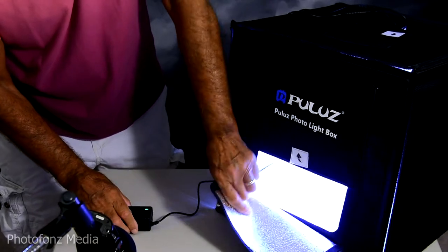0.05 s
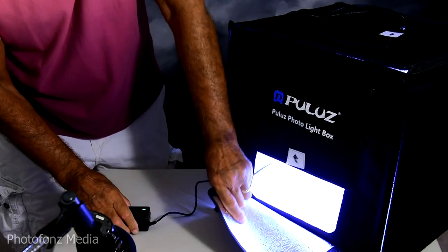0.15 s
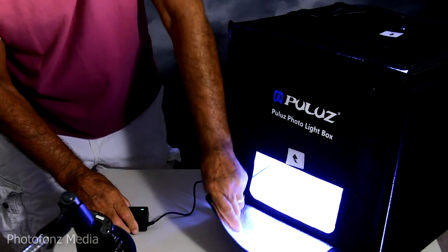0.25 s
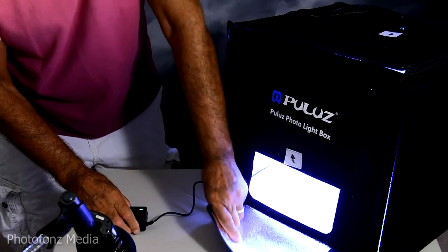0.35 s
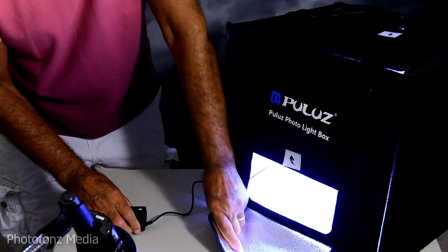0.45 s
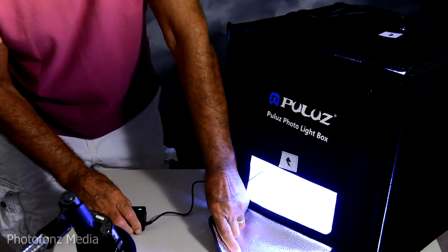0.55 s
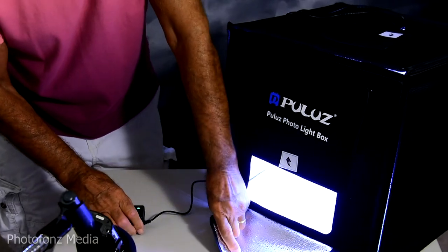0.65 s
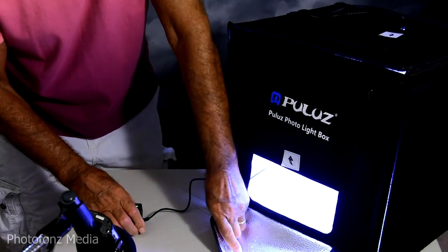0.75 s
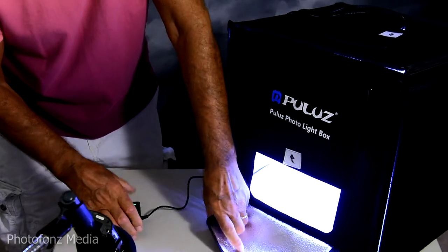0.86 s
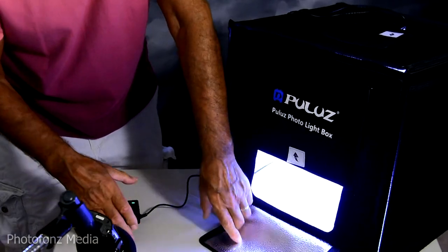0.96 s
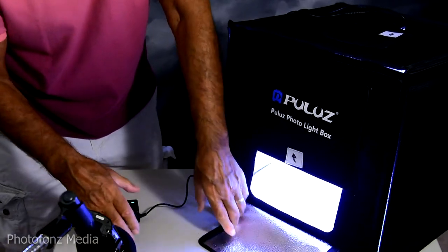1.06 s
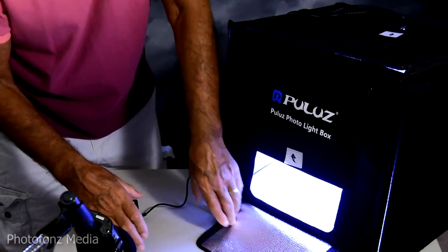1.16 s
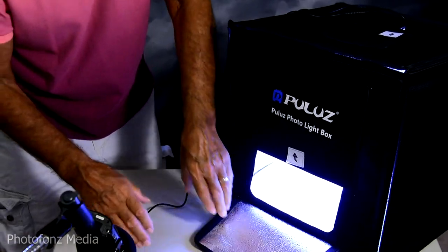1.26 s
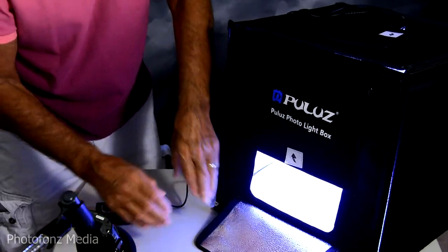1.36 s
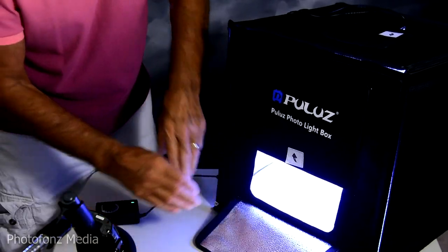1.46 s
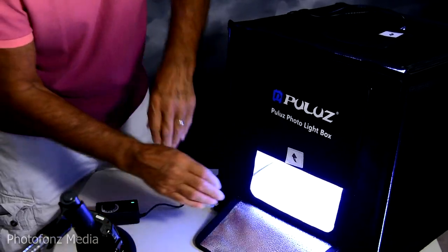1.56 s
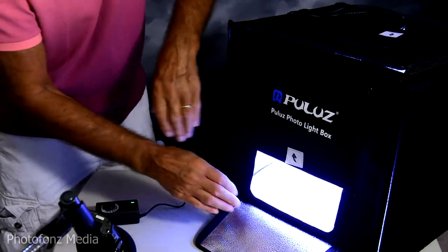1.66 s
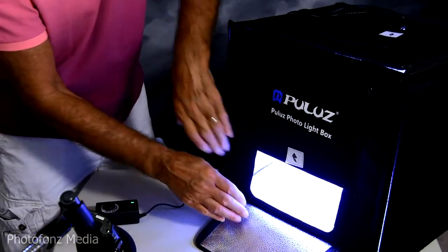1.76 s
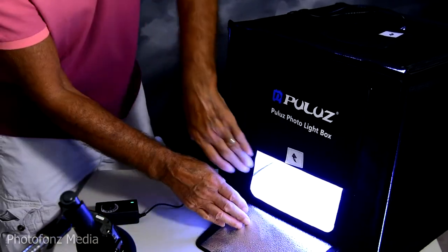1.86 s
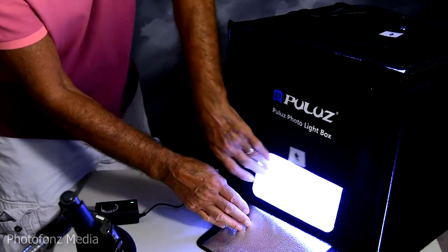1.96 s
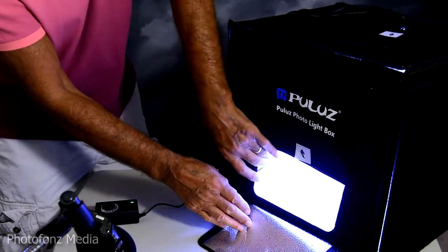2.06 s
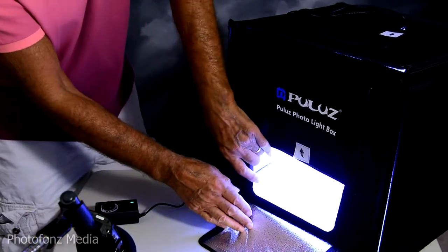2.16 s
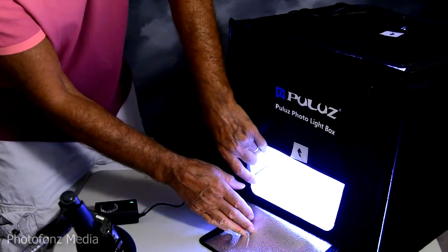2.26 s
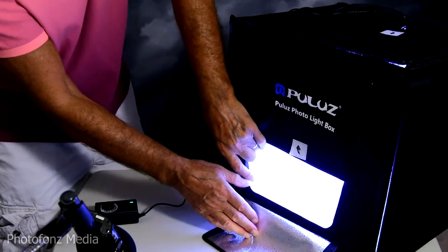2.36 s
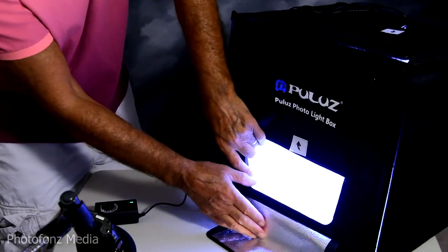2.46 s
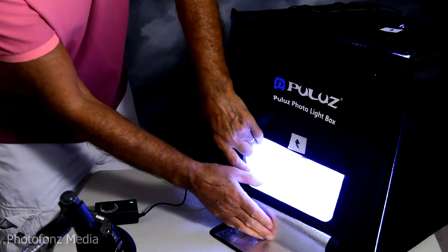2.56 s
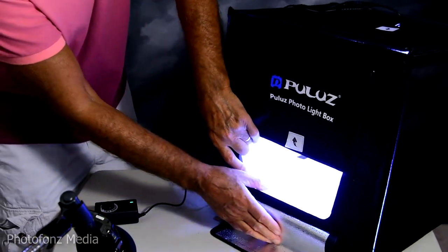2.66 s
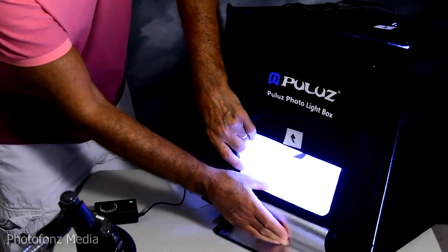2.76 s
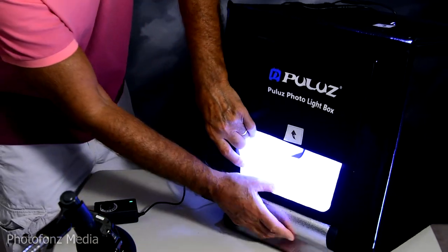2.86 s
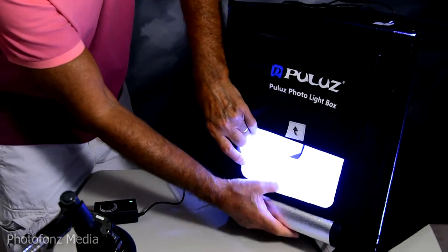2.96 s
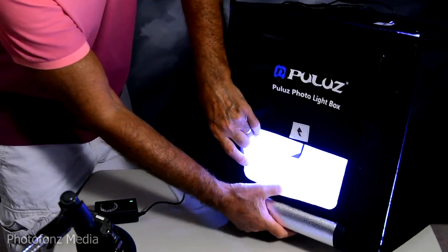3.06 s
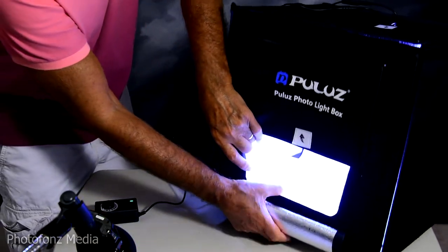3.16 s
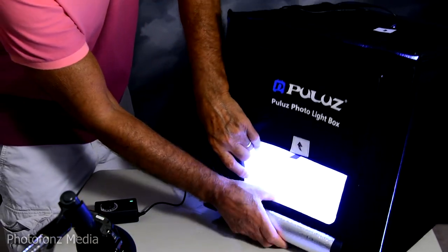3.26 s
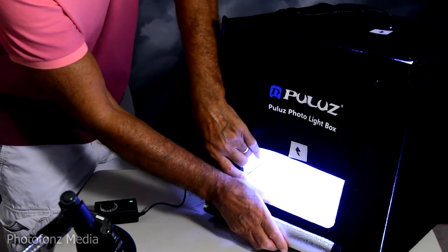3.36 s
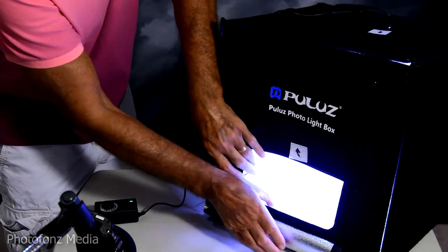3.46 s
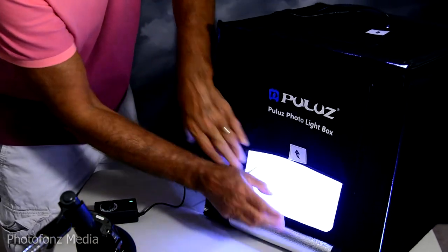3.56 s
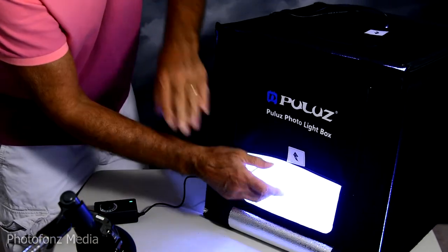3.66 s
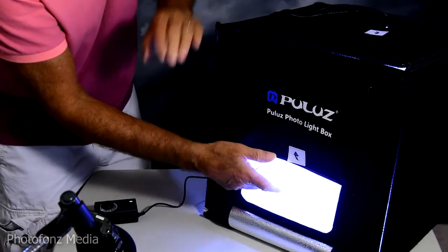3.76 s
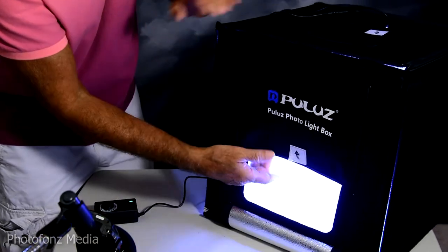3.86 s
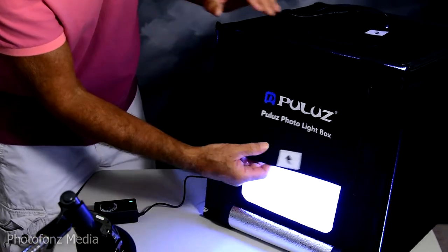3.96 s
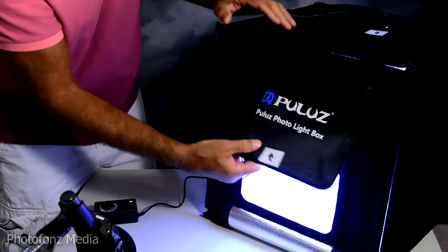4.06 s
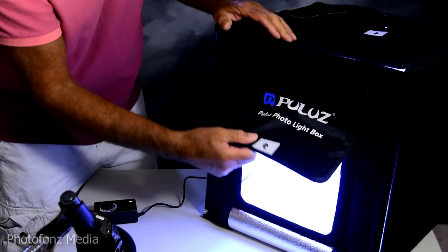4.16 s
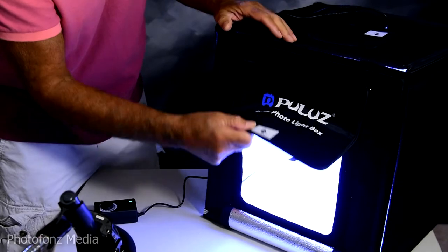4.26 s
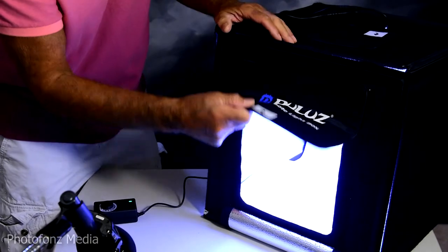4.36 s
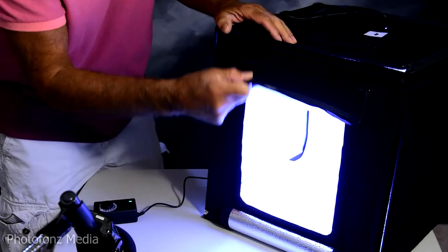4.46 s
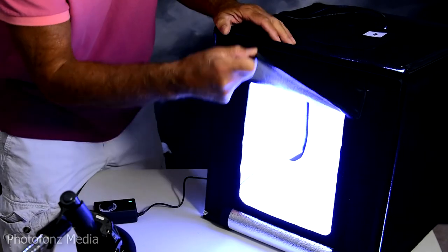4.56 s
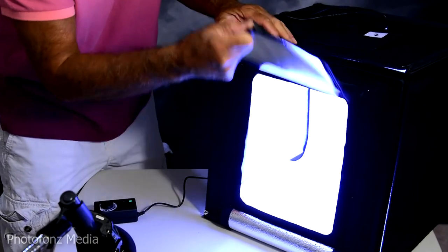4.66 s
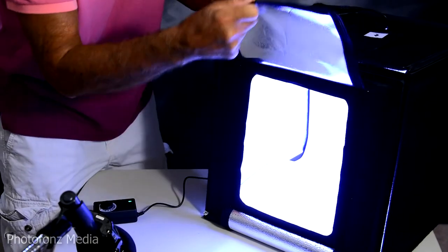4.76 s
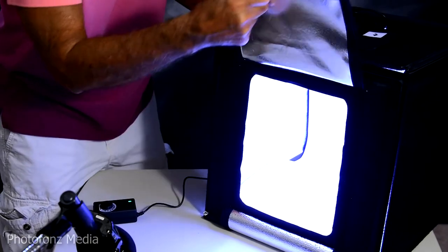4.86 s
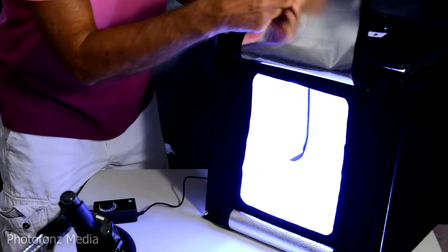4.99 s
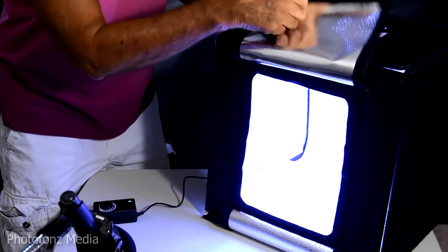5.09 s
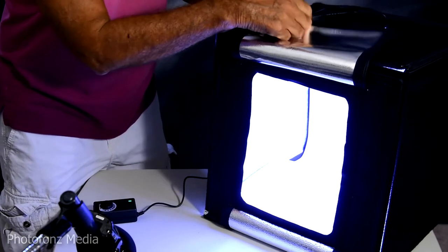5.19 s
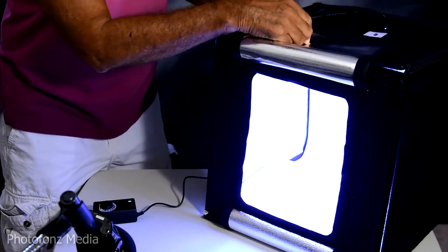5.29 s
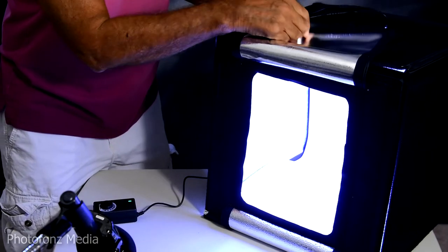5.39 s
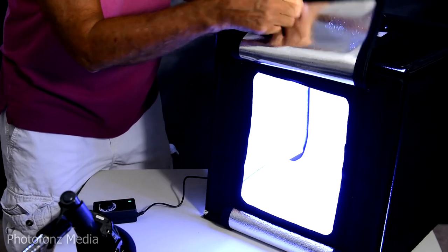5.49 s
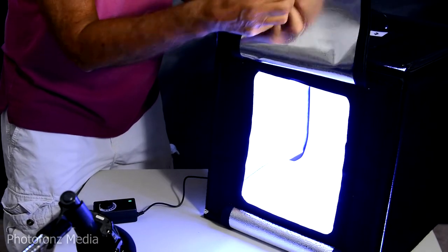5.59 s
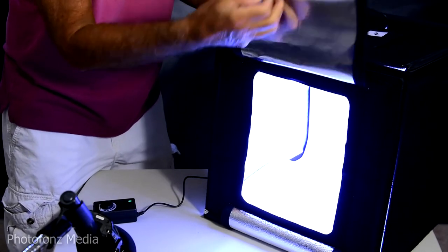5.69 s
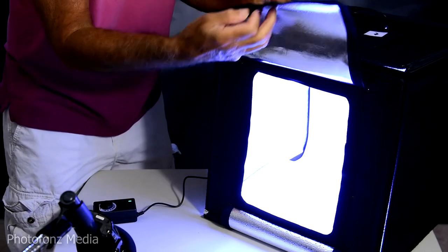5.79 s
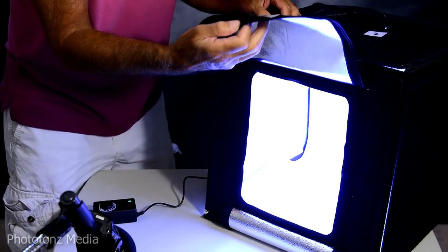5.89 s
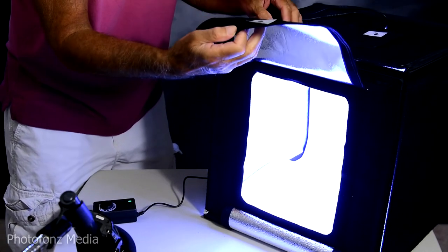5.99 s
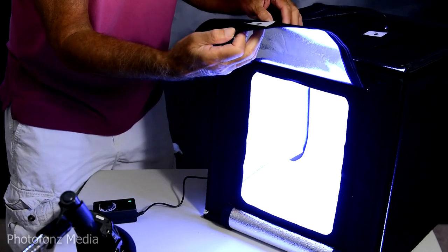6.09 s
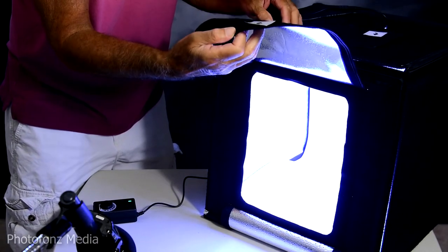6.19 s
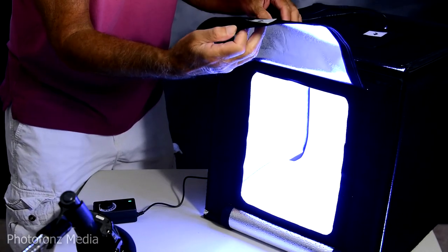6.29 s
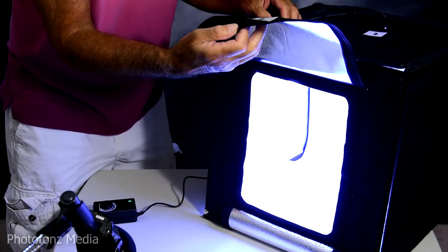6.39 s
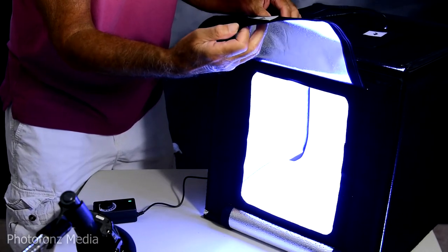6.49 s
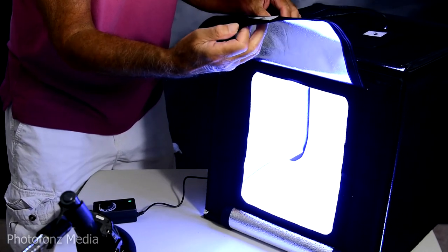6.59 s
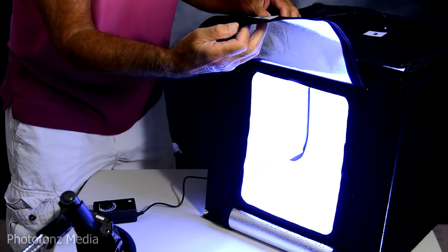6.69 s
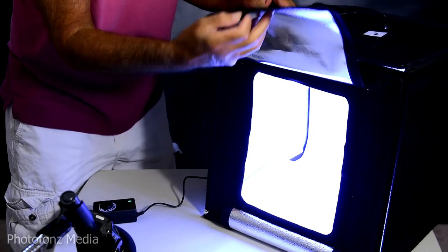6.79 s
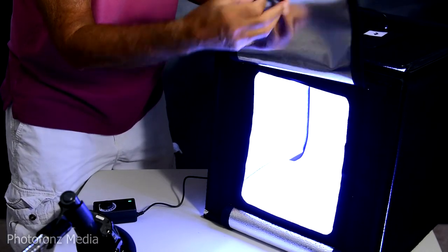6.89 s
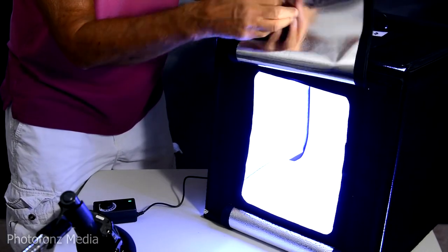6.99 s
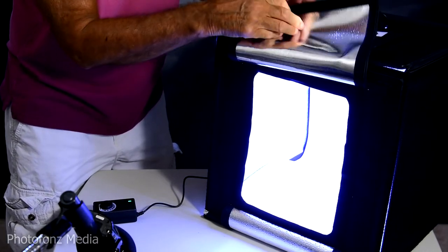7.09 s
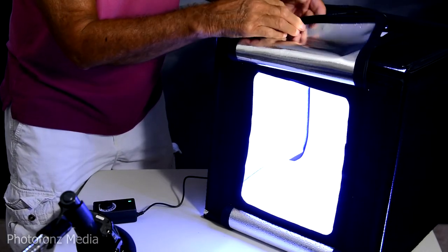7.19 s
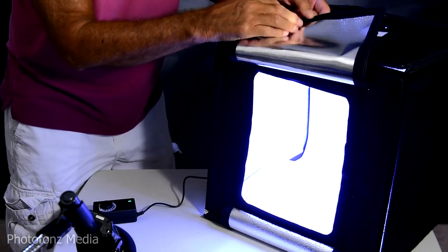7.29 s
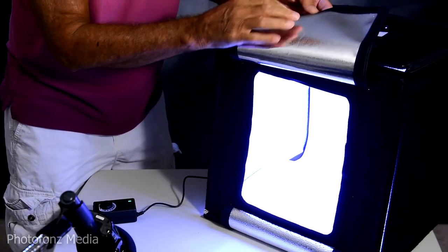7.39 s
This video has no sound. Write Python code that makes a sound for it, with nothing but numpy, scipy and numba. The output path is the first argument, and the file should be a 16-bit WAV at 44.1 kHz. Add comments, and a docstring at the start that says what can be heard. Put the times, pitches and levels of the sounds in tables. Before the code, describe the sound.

A short jerky hook-and-loop rip, soft cloth rubbing and foil crinkles, then a long crackling tear of fastener and quiet fabric scrapes in a small room.

```python
"""Hands open the hook-and-loop flaps of a foil-lined fabric box, close to two microphones in a small quiet room.
First a short rip: hooks let go in jerks that drum the taut panel, snap in the weave and crackle.
Then the cloth rubs and scrapes, the foil crinkles and pops, and near 3.1 s skin squeaks once on the foil.
From about 4.1 to 4.8 s a long strip tears open in dense, lumpy jerks and bright hook ticks.
Lighter scrapes follow, then near quiet, and a last patch of rubbing and crinkling ends the scene."""
import sys
import numpy as np
from scipy import signal
from scipy.fft import rfft, irfft, next_fast_len
from scipy.io import wavfile
from scipy.ndimage import uniform_filter1d
from numba import njit

SR = 44100
rng = np.random.default_rng(int(sys.argv[2]) if len(sys.argv) > 2 else 0)


def store_pcm(level_fs):
    """Save levels as 16-bit WAV."""
    pcm = np.round(np.clip(level_fs, -1, 1) * 32767).astype(np.int16)
    wavfile.write(sys.argv[1], SR, np.atleast_2d(pcm).T)


N = 328047

# Fastener jerks, a few hooks at once; scene() trims each of the three sounds.
# (t/s, snap level/dB, drum over snap/dB, crackle over snap/dB, fade/s)
JERK_EVENTS = [(0.0012, -11.5, 6.5, -7.5, 0.00048), (0.0237, -6, 4.5, -7.5, 0.00091),
               (0.0578, -19.5, -11, -4, 0.0012), (0.0721, -10.5, 2.5, -9.5, 0.00095),
               (0.0906, -9, 0, -9.5, 0.00071), (0.0989, -11, 0.5, -4, 0.0012),
               (0.205, -15, 6, -5.5, 0.0016), (0.2247, -8, 0.5, -10.5, 0.00059),
               (0.2411, -26, 0, -9, 0.0018), (0.2529, -13.5, -8.5, -11.5, 0.0015),
               (0.3, -7.5, -11.5, -21, 0.0011), (0.3063, -11.5, -1, -17, 0.0021),
               (0.3181, -3.5, -3, -12, 0.00061), (4.1185, -22.5, 11.5, -2.5, 0.0011),
               (4.1245, -32, -6, -3, 0.0011), (4.1463, -17, 5.5, -5.5, 0.0012),
               (4.1638, -15.5, 2.5, -2.5, 0.0071), (4.1769, -24.5, 4.5, -2.5, 0.0028),
               (4.2103, -21, 9.5, 6.5, 0.0055), (4.2145, -18.5, 6, 2.5, 0.0025),
               (4.2435, -22.5, -7, 8.5, 0.0024), (4.2609, -12, 6, 1, 0.0041),
               (4.281, -20.5, 5, -0.5, 0.0064), (4.3195, -17.5, 0.5, 0, 0.0054),
               (4.324, -17, 4.5, 0, 0.0024), (4.3377, -19, 3, 3.5, 0.0051),
               (4.3599, -15.5, 4, -1.5, 0.0088), (4.3765, -18.5, 3.5, 6, 0.0038),
               (4.386, -19.5, 3.5, -2.5, 0.0054), (4.3925, -18.5, 1, -4.5, 0.002),
               (4.399, -15.5, 3.5, -4.5, 0.003), (4.4145, -16.5, 6, -6.5, 0.0024),
               (4.4185, -17, 5.5, -4, 0.0018), (4.4329, -22.5, 2.5, 6, 0.002),
               (4.439, -19.5, 3, 2.5, 0.0043), (4.463, -21.5, 6, -0.5, 0.0018),
               (4.4702, -14.5, 5.5, -3, 0.0016), (4.482, -18, 3.5, 1.5, 0.0023),
               (4.4913, -22.5, 8.5, 6.5, 0.0015), (4.5035, -20, 6, 4.5, 0.0053),
               (4.5227, -22, 12, 9, 0.00058), (4.5383, -9.5, 9.5, 11, 0.0005),
               (4.5486, -15.5, 8, 5.5, 0.0015), (4.5805, -14.5, 3.5, 10, 0.0022),
               (4.586, -15, 5.5, -0.5, 0.0016), (4.5987, -9.5, 0, 9, 0.0015),
               (4.6032, -6.5, -0.5, -2.5, 0.0021), (4.6141, -19.5, 1, 4, 0.0024),
               (4.6354, -6, 2, 5, 0.0023), (4.6483, -18, -1, -2.5, 0.007), (4.6581, -18, -13.5, 4, 0.00081),
               (4.6681, -11.5, -2.5, 9, 0.0014), (4.6777, -16.5, 8.5, 11, 0.0015),
               (4.6854, -27.5, 7, 10.5, 0.00075), (4.6942, -10, -2, -2.5, 0.0042),
               (4.7002, -3, -2, -9.5, 0.0028), (4.709, -21, -8, 3.5, 0.0009),
               (4.7502, -18, 7.5, 4.5, 0.0011)]
# Creases of the foil lining popping; trimmed in scene() too.
# (t/s, snap level/dB, drum over snap/dB, crackle over snap/dB, fade/s)
CREASE_EVENTS = [(0.153, -37.5, -10, 14.5, 0.0007), (0.4795, -43, -5, 2, 0.001),
                 (0.5923, -40, 0, 4, 0.00075), (0.7098, -46, 13, -20, 0.0024),
                 (0.7289, -34, 8, -22, 0.00086), (0.8258, -29, -17, -12, 0.00075),
                 (0.9805, -17.5, -17, -30, 0.0028), (1.0589, -37.5, -2, -10, 0.0047),
                 (1.1799, -44.5, 3, -16, 0.003), (1.4064, -60, 19, -21, 0.0026),
                 (1.8735, -50, 18, -12.5, 0.00079), (1.9104, -38.5, -8, -25, 0.0015),
                 (2.2118, -35.5, 2, 17, 0.0007), (2.2488, -32, 3, 11, 0.001),
                 (2.2974, -29.5, 11, 16, 0.001), (2.9709, -26, -2, -9, 0.0021),
                 (3.2559, -32, 15, -17, 0.0017), (3.2705, -24, -12, -25, 0.0012),
                 (3.5416, -27, 9.5, 3.5, 0.0015), (3.6079, -26, -3, -2, 0.0012),
                 (3.6401, -35, -10, 18, 0.00038), (3.7148, -37, 7, -6, 0.0033),
                 (3.8127, -58.5, 11, -15, 0.0072), (3.865, -44, 7, 3, 0.0081),
                 (4.0381, -33.5, 7, 7, 0.0018), (4.0768, -29.5, 4, 3.5, 0.0013),
                 (5.015, -25.5, -28, -2, 0.00057), (5.1578, -37, 6, 18, 0.0049),
                 (5.3304, -23, -3, 5.5, 0.0025), (5.4827, -36, -5, 8, 0.001), (5.557, -40, -4, 9, 0.0024),
                 (5.5922, -33, -23, -3, 0.0016), (5.7373, -33.5, -6, 4, 0.00051),
                 (5.9028, -43, -13, 5, 0.001), (6.2902, -58, -4.5, -12, 0.0013),
                 (6.5103, -56.5, -7, -5.5, 0.0015), (6.5451, -56.5, -11, 11, 0.00084),
                 (6.8229, -47, -7, 13, 0.0011), (6.9048, -42, -6, 3, 0.0016), (6.993, -48, -8, 8, 0.0006),
                 (7.014, -43.5, -13, -8, 0.016), (7.0267, -44, -8, 0, 0.0016), (7.0473, -38, -3, 1, 0.0029),
                 (7.1202, -45, 6, -18, 0.0032), (7.136, -43, -10, 16, 0.0007),
                 (7.1459, -39, -1, 22, 0.00067), (7.1685, -37, -5, 2, 0.0014), (7.1868, -32, 3, -4, 0.0016),
                 (7.2125, -38, -14, 7.5, 0.0027), (7.2343, -29.5, -4.5, -18, 0.0065),
                 (7.3251, -27, -19, 1, 0.0018), (7.3474, -34, -8, -9, 0.003)]
# Single hooks snapping free of their loops, before colouring: (t/s, level/dB)
HOOK_TICK_EVENTS = [(4.1188, -17.5), (4.1407, -19), (4.1466, -15), (4.3217, -16.5), (4.3406, -12.5),
                    (4.3768, -8.5), (4.384, -8.5), (4.3933, -15), (4.416, -13.5), (4.4341, -11),
                    (4.4392, -13.5), (4.4455, -16), (4.4508, -16), (4.4634, -10.5), (4.4653, -11.5),
                    (4.4705, -10.5), (4.4766, -13), (4.4819, -10.5), (4.4851, -8), (4.4915, -7),
                    (4.4972, -11.5), (4.5024, -7), (4.5075, -6), (4.5091, -9.5), (4.518, -12),
                    (4.5228, -9.5), (4.5237, -6.5), (4.528, -10), (4.5395, -4.5), (4.5437, -7.5),
                    (4.549, -9.5), (4.556, -10), (4.5792, -9.5), (4.583, -5.5), (4.5861, -8.5),
                    (4.5992, -5), (4.6035, -6.5), (4.6159, -13), (4.6199, -12.5), (4.63, -14),
                    (4.6365, -4.5), (4.641, -4.5), (4.6465, -9), (4.6499, -8.5), (4.6585, -6.5),
                    (4.6644, -6.5), (4.669, -4.0), (4.678, -3.0), (4.6853, -6.5), (4.694, -3),
                    (4.7009, -9.5), (4.7093, -12.5), (4.75, -4.5)]
# Tone of a hook's bright tip: (f/Hz, level/dB)
HOOK_TICK_TONE = [(1500, -22), (5000, -8), (8000, 5), (12000, 12.5), (15500, 9.5), (20000, 1)]
# The flap tightens as it is pulled, raising its modes: (t/s, pitch ratio)
FLAP_TENSION = [(0, 0.96), (4.1, 0.98), (4.25, 0.98), (4.42, 1.03), (4.55, 1.14), (4.7, 1.06), (4.76, 1.1)]
# Resonances of the taut flap, before the tension ratio: (f/Hz, width/Hz, level/dB)
FLAP_MODES = [(154, 48, -6), (280, 78, 1.5), (610, 75, -0.5), (704, 200, 3.5), (1163, 700, -5.5),
              (2050, 170, -16)]
# Tone of the weave's snap and hiss: (f/Hz, relative level/dB)
WEAVE_TONE = [(500, -6.5), (1300, -1), (2100, -2), (2650, -5), (3100, -4.5), (3600, -2.5), (4500, -5),
              (6000, -12), (12000, -33.5)]
# Tone of the crackle of hooks and foil: (f/Hz, relative level/dB)
CRACKLE_TONE = [(2000, -20), (4500, -7.5), (6500, -1.5), (8500, -1.5), (11000, 1.5), (14000, -2),
                (20000, -15.5)]
# The hands on the cloth, one list of rows per move.
# (t/s, scrape level/dB, drum over scrape/dB, treble over scrape/dB)
HAND_MOVES = [
    [(0, -36.5, 1.5, -5), (0.104, -42, 5, -4.5), (0.16, -44.5, 6, -6), (0.19, -51, 9.5, -0.5),
     (0.28, -48.5, 4, 3.5), (0.327, -40.5, -5.5, 3), (0.383, -47.5, 5, -6.5), (0.423, -53, 1.5, -4.5),
     (0.455, -55.5, -3, -4.5), (0.517, -57.5, 1, 0)],
    [(0.529, -63, -4, 5), (0.56, -61.5, 13, 2), (0.58, -59.5, 12, 0), (0.64, -59, 9, -0.5),
     (0.704, -59, 13.0, -5), (0.728, -46.5, 13, -14), (0.8, -41.5, 5, -7.5), (0.85, -48, 9, -5.5),
     (0.89, -45.5, 15, -4), (0.972, -50.5, 11, -1.5), (0.984, -31, -3, -17), (1.01, -39.5, 2.5, -13),
     (1.04, -48, 6.5, -10), (1.151, -58, -4, -8), (1.203, -58.5, 1, 0), (1.295, -79, 6, 4.5),
     (1.357, -80.5, 18, 5)],
    [(1.8, -79, -0.5, 2), (1.848, -87, -5, 13), (1.916, -50, 10.5, -20), (1.952, -66, 14.5, 1),
     (2.0, -50.5, -4, -7), (2.03, -40.5, -14, -12), (2.085, -42, -10, -9.5), (2.143, -54, -17, -0.5),
     (2.19, -47.5, 6.5, 1), (2.23, -48.5, 2, 2), (2.259, -50.5, 3, 1), (2.347, -47, 3.5, -5.5),
     (2.546, -46.5, -0.5, -3)],
    [(2.558, -50.5, -2, -1), (2.622, -40.5, 3, -9.5), (2.67, -47, 3.5, -3), (2.738, -40.5, 3, -7),
     (2.854, -45, -3, -0.5), (2.897, -44, 0, 0), (2.981, -26.5, -7, -5.5), (3.001, -36.5, -7, -6),
     (3.157, -40, -11, -6.5), (3.207, -44.5, -5, -7.5)],
    [(3.219, -50.5, -2.5, 1.5), (3.271, -38.5, 9.5, -4.5), (3.291, -52, 5, 2.5), (3.318, -43.5, 2, -5),
     (3.362, -39, 2.5, -5.5), (3.454, -37, 4.5, -5.5), (3.53, -35, 2.5, -8), (3.554, -46, 5, -1),
     (3.753, -59, -3, -9.5), (3.797, -72, 3, -2)],
    [(3.809, -68, -0.5, -3), (3.853, -62, -11, -1), (3.875, -56, -9, 4.5), (3.989, -55, -2, 2),
     (4.005, -46.5, -2, -2), (4.033, -48, 3, 4), (4.053, -49, 2, 2), (4.107, -56, 1, 1)],
    [(4.12, -45, 2.5, -3), (4.151, -33, -3, 5.5), (4.2, -41.5, -11.5, 6.5), (4.23, -34.5, -4, 3),
     (4.305, -35.5, -2, 0), (4.38, -29.5, -3, -2), (4.41, -33.5, -8, 1), (4.5, -29, -8, 0.5),
     (4.548, -31, -7.5, -2), (4.565, -43, 3, -2), (4.59, -28.5, -4, 1.5), (4.628, -30.5, -1, 1.5),
     (4.649, -24, -4, 2), (4.689, -28.5, 2, -1.5), (4.741, -41, 2.5, -0.5), (4.821, -51.5, 0, -5.5),
     (4.897, -53.5, -2, -4.5)],
    [(4.909, -57.5, -1, -4.5), (4.997, -50.5, -32, 7), (5.03, -50.5, -20, 5), (5.088, -56.5, -5, 6.5),
     (5.164, -45, 0.5, 5), (5.224, -45, -30, -1.5), (5.265, -43, -12, 2.5), (5.284, -37, -7, 5),
     (5.318, -47, 1, 5), (5.336, -44, -1, 3), (5.38, -53.5, -5.0, 0.5), (5.418, -57.5, 4, 7)],
    [(5.43, -55, -1, 5.5), (5.474, -56, -12, 4), (5.494, -39.5, -9, 1.5), (5.58, -58, -3, 3.5),
     (5.64, -33.5, -13, -17.5), (5.709, -58.5, -10, -6.0), (5.769, -46, -2, 0), (5.797, -55.5, 8.5, -1.5),
     (5.849, -66.5, 4, 2), (5.893, -69.5, 1, 2), (6.016, -78.5, 3, -2)],
    [(6.749, -85, 13, 6), (6.785, -69, -4, -1), (6.832, -67, -3.0, -1), (6.865, -51, -7, -12),
     (6.91, -63, -2, 5.5), (6.98, -55.5, 8.5, 4.5), (7.008, -60, 8, -2), (7.016, -47, -2, -2),
     (7.04, -50.5, 3, -4), (7.092, -51, -5, -10), (7.136, -58, -24, -0.5), (7.188, -49.5, -22, 0.5),
     (7.24, -40.5, -9, -2), (7.3, -58.5, 2, 1.5), (7.32, -59, -4, 4), (7.33, -42.5, -6, 1.5),
     (7.371, -48.5, -11, 1.5), (7.427, -53, 5, -3)],
]
# The part of the flap under the hand, one row per move; both resonances wander around these pitches.
# (drum f/Hz, scrape f/Hz, foil over weave/dB, broad scrape level/dB, lining ring f/Hz, ring over weave/dB)
HAND_GRIPS = [(307, 1100, -3, -5.5, 2800, -28), (362, 920, -7, -8.5, 4250, -22.5),
              (288, 1150, -4.5, -2.5, 3080, -18), (170, 1216, -5.5, 0, 3100, -17.5),
              (277, 910, -8, 0, 3450, -25), (246, 740, -3, -4, 3400, -31.5),
              (310, 850, -2.5, -11, 2760, -17), (340, 1610, -1.5, -18, 3010, -11),
              (289.5, 1354, -2, -14, 2980, -18.5), (307, 1490, -1, -1.5, 3110, -16)]
# Short pitched pops: a fingertip knocking the panel, a patch of foil buckling, or the body of the flap thumping
# as the long strip tears. # (t/s, peak level/dB, f/Hz, fade/s)
KNOCK_EVENTS = [(0.205, -7, 1250, 0.0012), (0.2935, -27, 2500, 0.0006), (0.3063, -17, 905, 0.001),
                (0.9805, -9, 2460, 0.00092), (0.981, -29, 1000, 0.0023), (1.406, -41, 1000, 0.001),
                (1.407, -46, 480, 0.003), (1.8735, -31.5, 790, 0.0031), (2.0, -37, 200, 0.006),
                (2.093, -32, 298, 0.004), (2.1469, -22.5, 330, 0.0037), (2.298, -24, 4630, 0.001),
                (3.086, -24, 700, 0.0043), (3.2561, -7.5, 1510, 0.00039), (3.262, -19, 1020, 0.002),
                (3.262, -28, 161, 0.028), (3.2705, -22, 3800, 0.0006), (3.276, -28.5, 262, 0.01),
                (3.812, -40.5, 900, 0.002), (3.8385, -44, 3700, 0.001), (3.9525, -35.5, 560, 0.0033),
                (4.125, -15, 320, 0.0048), (4.1465, -12, 744, 0.0027), (4.163, -10, 1000, 0.0072),
                (4.177, -9, 800, 0.0025), (4.211, -9, 725, 0.0033), (4.2615, -13.5, 690, 0.0058),
                (4.2815, -11, 678, 0.0058), (4.322, -16.5, 740, 0.003), (4.344, -12, 334, 0.0052),
                (4.3925, -8, 700, 0.0032), (4.416, -16, 660, 0.0035), (4.491, -11, 705, 0.0027),
                (4.504, -12.5, 770, 0.004), (4.523, -7, 805, 0.003), (4.586, -14, 2920, 0.0015),
                (4.604, -12, 2092, 0.002), (4.645, -13.5, 3000, 0.002), (4.698, -8.5, 860, 0.0044),
                (5.0166, -19.5, 3000, 0.001), (5.283, -25, 3050, 0.003), (5.302, -30.5, 160, 0.0092),
                (5.3309, -17.5, 1600, 0.0015), (5.332, -22.5, 624, 0.0065), (5.9025, -38, 2610, 0.0007),
                (6.51, -50, 2000, 0.0008), (6.715, -51, 3300, 0.0008), (6.8229, -49, 3270, 0.0012),
                (6.8229, -33.5, 5540, 0.0005), (6.958, -43, 676, 0.012), (6.905, -42, 3100, 0.0012),
                (7.027, -32, 3510, 0.004), (7.1197, -29.5, 1390, 0.0024), (7.147, -36, 1570, 0.0025),
                (7.1685, -29, 1550, 0.002), (7.213, -32, 1620, 0.002), (7.232, -29.5, 261, 0.0084),
                (7.234, -30, 623, 0.0044), (7.3255, -25.5, 1960, 0.0018), (7.393, -31, 630, 0.0067),
                (7.396, -29, 263, 0.0045), (7.399, -28, 970, 0.0048)]
# Skin squeaking on foil.
# (t/s, first partial level/dB, first partial f/Hz, second partial f/Hz, second over first/dB, half length/s)
SQUEAK_EVENTS = [(3.075, -11, 1165, 2140, -3, 0.0023)]
# The box frame wobbling and air pushed by the flap: (t/s, level/dB)
WOBBLE_LEVEL = [(0.0, -43), (0.04, -38), (0.54, -61), (0.93, -65), (1.04, -53), (1.1, -63), (1.68, -71),
                (2.22, -42.5), (2.3, -57.5), (2.8, -38.5), (2.86, -45.5), (3.09, -41), (3.15, -50.5),
                (3.38, -42.5), (3.73, -57), (4.12, -47.5), (4.18, -27.5), (4.6, -39), (4.76, -33),
                (4.81, -52), (6.53, -71), (7.4, -52.5), (7.44, -75)]
# Tone of that wobble: (f/Hz, relative level/dB)
WOBBLE_TONE = [(15, -28.5), (35, -6), (65, 0.5), (120, -4.5), (200, -6), (2000, -76.5)]
# Level of the side (left-right difference) view as it is mixed in: (f/Hz, gain/dB)
SIDE_GAIN = [(30, -5.5), (120, -14), (500, -20.5), (2500, -30), (4500, -13.5), (8000, -4), (16000, -3.5)]
# Balance of the two microphones: (f/Hz, left minus right/dB)
LEFT_OVER_RIGHT = [(30, 1.5), (1200, 2.5), (3000, 0.5), (16000, 0.5)]
# Tone of the quiet room and preamp: (f/Hz, relative level/dB per Hz)
HUSH_TONE = [(15, -38.5), (25, 0), (70, 0.5), (108, -9.5), (384, -21.5), (677, -23.5), (3720, -35.5),
             (5730, -36), (12200, -38), (16000, -46)]

# The thick of the long rip holds lesser jerks at random.
TEAR_START_S, TEAR_END_S = 4.28, 4.56
SMALL_JERK_MID_DB, SMALL_JERK_FADE_S = -21.5, 0.0014
# While the long strip tears, hooks let go in clumps.
RIP_START_S, RIP_END_S, RIP_LUMPS_DB, RIP_LUMPS_PER_S = 4.12, 4.8, 3.5, 110
CRACKLE_LEAD = 0.9  # strength of the first release in the crackle, against drum and snap
PUSH_DB, PUSH_FADE_S = -5, 0.00009  # typical push against the hook tick; its fade
TICK_SPREAD = 0.25  # left-right scatter of the hook tips
FOIL_TICK_DB, FOIL_TICK_FADE_S = -2.5, 0.00045  # base level of foil ticks over the weave hiss
DRUM_WANDER, SCRAPE_WANDER = 0.16, 0.08  # share of the resonance
GRIP_SWELL_DB = 1.1  # slow unevenness of the grip
SQUEAK_SCRATCH_DB = -3.5
ROOM_DB, ROOM_T60_S = -9.5, 0.19  # tail level before its tone is shaped; time to fall by 60 dB
HUSH_DB = -56.5
STEP_HZ, TOP_HZ = 16000, 16900


def undb(db):
    """Turn decibels into a gain."""
    return 10 ** (np.asarray(db) / 20)


def unit(x):
    """Scale to an average strength (rms) of 1."""
    return x / np.sqrt(np.mean(x ** 2, axis=-1, keepdims=True))


def noise():
    """Hiss as long as the scene: a fresh random number for each sample."""
    return rng.standard_normal(N)


def curves(table):
    """Draw straight lines between a table's rows, giving each column sample by sample."""
    s, *columns = np.transpose(table)
    return [np.interp(np.arange(N) / SR, s, column) for column in columns]


def colour(x, points, keep_rms=False):
    """Shape the tone by (f/Hz, level/dB) points; keep_rms leaves white noise as strong as before."""
    size = next_fast_len(x.shape[-1])
    hz, db = np.transpose(points)
    log_hz = np.log(np.fft.rfftfreq(size, 1 / SR) + 1)
    gain = undb(np.interp(log_hz, np.log(hz), db))
    if keep_rms:
        gain = unit(gain)
    return irfft(rfft(x, size) * gain, size)[..., :x.shape[-1]]


@njit
def svf(x, hz, width):
    """Ring a resonance whose pitch may move (state-variable band-pass); white noise keeps its rms."""
    y, band, low = np.empty(len(x)), 0., 0.
    for i in range(len(x)):
        g, k = np.tan(np.pi * hz[i] / SR), width / hz[i]
        v = (band + g * (x[i] - low)) / (1 + g * (g + k))
        band, low, y[i] = 2 * v - band, low + 2 * g * v, k * v
    return y * np.sqrt(SR / np.pi / width)


def steep(x, hz, width):
    """Pass a resonance twice, so sound away from its pitch falls off faster."""
    return svf(svf(x, hz, width), hz, width) * np.sqrt(2 * np.pi * width / SR)


def walk(rate):
    """Wander smoothly between random levels, about `rate` a second, with a spread near 1."""
    k = int(SR / rate)
    held = np.repeat(rng.standard_normal(N // k + 1), k)
    return 1.35 * uniform_filter1d(uniform_filter1d(held, k), k)[:N]


def box(hands, slips, hooks, creases, lead):
    """One view of the box: slips and releases get random signs, then ring panel, weave and foil."""
    drum_db, drum_hz, scrape_db, scrape_hz, hiss_db, sizzle_db, broad_db, ring_hz, ring_db = hands
    chance = noise()
    rub = slips * chance
    hook = lead * hooks[0] + hooks[1] * chance
    crease = lead * creases[0] + creases[1] * chance
    # rows of hook and crease: drum, snap, crackle
    tension = curves(FLAP_TENSION)[0]
    struck = hook[0] + 0.091 * crease[0]
    panel = sum(undb(db) * svf(struck, hz * tension, 1. * width) for hz, width, db in FLAP_MODES)
    # the part of the flap under the hand changes size, so its resonances wander
    low = steep(undb(drum_db) * rub + 0.027 * crease[0], np.clip(drum_hz, 100, 900), 300.)
    scrape = undb(scrape_db) * slips * noise() + 0.26 * crease[0]
    broad_tone = [(150, -36.5), (500, -0.5), (900, -0.5), (1800, -11), (3500, -16.5), (9000, -30.5)]
    broad = colour(scrape, broad_tone, keep_rms=True)
    high = 0.71 * steep(scrape, np.clip(scrape_hz, 500, 3000), 340.) - undb(broad_db) * broad
    # a crease gives way more softly than a hook, so its snap is duller
    soft_snap = 2 * uniform_filter1d(crease[1], size=4)
    hiss = undb(hiss_db) * slips * noise()
    weave = colour(hook[1] + soft_snap + hiss, WEAVE_TONE, keep_rms=True)
    # the stretched lining sings faintly
    weave = weave + undb(ring_db) * svf(weave, ring_hz * (1 + 0.04 * walk(11)), 240.)
    foil = colour(hook[2] + crease[2] + undb(sizzle_db) * rub, CRACKLE_TONE, keep_rms=True)
    return panel + low + high + weave + foil + wobble()


def jerks(count):
    """List the loud jerks of the fastener, plus lesser ones at random in the thick of the rip."""
    lesser = []
    for when, a, b, c in rng.random((count, 4)):
        s = TEAR_START_S + when * (TEAR_END_S - TEAR_START_S)
        db = SMALL_JERK_MID_DB + 8 * (a - .5)
        lesser.append((s, db, 4 + 6 * (b - .5), 5 + 6 * (c - .5), SMALL_JERK_FADE_S))
    return JERK_EVENTS + lesser


def pops(table, share, first, drum_db, snap_db, crackle_db):
    """Drive drum, snap and crackle: a sharp first release, then a fading scatter of smaller ones."""
    length = 2048
    t = np.arange(length) / SR
    drive = np.zeros((2, 3, N + length))  # first release and scatter, for each of the three sounds
    for s, db, drum, crackle, fade in table:
        hits = (rng.random(length) < share) / np.sqrt(share)
        scatter = hits * np.exp(-(t / np.clip(fade, .0003, .015)) ** 0.66)
        gain = undb(db + np.array([drum + drum_db, snap_db, crackle + crackle_db]))
        at = int(s * SR)
        drive[0, :, at] += first * gain * [1, 1, CRACKLE_LEAD]
        drive[1, :, at:at + length] += gain[:, None] * scatter
    return drive[..., :N]


def hook_ticks():
    """Click once per hook: a bright tip on a blunt one-sided push, each from its own spot; mid and side."""
    s, db = np.transpose(HOOK_TICK_EVENTS)
    push, spot = rng.standard_normal((len(s), 2)).T
    sizes = np.array([np.ones(len(s)), undb(PUSH_DB + 3 * push), TICK_SPREAD * spot])
    clicks = np.zeros((3, N))
    np.add.at(clicks, (slice(None), (s * SR).astype(int)), undb(db) * sizes)
    tip, side = colour(clicks[::2], HOOK_TICK_TONE)
    blunt = signal.lfilter([1], [1, -np.exp(-1 / (PUSH_FADE_S * SR))], clicks[1])
    return tip + blunt, side


def handling():
    """Follow the hands: levels of drum, scrape, weave and foil, and the resonances under the grip."""
    rows = [tuple(row) + tuple(grip) for move, grip in zip(HAND_MOVES, HAND_GRIPS) for row in move]
    scrape, drum, treble, drum_hz, scrape_hz, foil, broad, ring_hz, ring = curves(rows)
    drum_hz = drum_hz * (1 + DRUM_WANDER * walk(15))
    scrape_hz = scrape_hz * (1 + SCRAPE_WANDER * walk(10))
    hiss, sizzle = scrape + treble - foil / 2, scrape + treble + foil / 2
    return scrape + drum, drum_hz, scrape, scrape_hz, hiss, sizzle, broad, ring_hz, ring


def fibres(rate, spread_db, smooth):
    """Size of each fibre's slip: uneven clicks over a smooth share, while the grip catches and slides."""
    clicks = (rng.random(N) < rate / SR) * undb(spread_db * rng.exponential(size=N))
    grip = undb(GRIP_SWELL_DB * walk(30) + 1.6 * walk(90))
    return unit((unit(clicks) + smooth) * grip)


def clumps():
    """Gain of the slips: lumpy while the long strip tears, even elsewhere."""
    t = np.arange(N) / SR
    lumps = unit(undb(RIP_LUMPS_DB * walk(RIP_LUMPS_PER_S)))
    return np.where((t > RIP_START_S) & (t < RIP_END_S), lumps, 1)


def creases(weave_db, count):
    """List the loud foil creases, plus small random ticks that follow how strongly the cloth moves."""
    small = []
    for when, a, b, c in rng.random((count, 4)):
        at = when * (N - 1)
        db = weave_db[int(at)] + FOIL_TICK_DB - 4 * np.log(a + 0.0081)  # few are much louder
        small.append((at / SR, db, -8 + 14 * b, -12 + 16 * c, FOIL_TICK_FADE_S))
    return CREASE_EVENTS + small


def knocks():
    """Knock panel or foil: sine pops that die away quickly."""
    t = np.arange(SR // 10) / SR
    out = np.zeros(N + len(t))
    for s, db, hz, fade in KNOCK_EVENTS:
        out[int(s * SR):][:len(t)] += undb(db) * np.sin(2 * np.pi * hz * t) * np.exp(-t / fade)
    return out[:N]


def squeaks():
    """Squeak skin on foil: a few quick stick-slip cycles, with scratch, that swell and fade."""
    t, out = np.arange(N) / SR, 0
    scratch_tone = [(400, -17.5), (900, 5), (4000, -4.5), (5500, -26.5)]
    for s, db, hz, upper_hz, upper_db, half in SQUEAK_EVENTS:
        tone = np.cos(2 * np.pi * hz * (t - s))
        upper = undb(upper_db) * np.cos(2 * np.pi * upper_hz * (t - s))
        scratch = undb(SQUEAK_SCRATCH_DB) * colour(noise(), scratch_tone, keep_rms=True)
        swell = np.exp(-.5 * ((t - s) / half) ** 2)
        out = out + undb(db) * (tone + upper + scratch) * swell
    return out


def wobble():
    """Wobble the frame and push air: low rumbling noise that rises and falls."""
    return undb(curves(WOBBLE_LEVEL)[0]) * colour(noise(), WOBBLE_TONE, keep_rms=True)


def room(x):
    """Echo off a small room: a short tail of fading noise, different at each microphone."""
    t = np.arange(SR // 3) / SR
    fade = np.exp(-np.log(1000) * t / ROOM_T60_S) * np.clip(t / 0.0034, 0, 1)
    tail = unit(rng.standard_normal((2, len(t))) * fade) / np.sqrt(len(t))
    tail = colour(tail, [(30, -7), (500, -5), (4000, -4), (16000, 2)])
    return undb(ROOM_DB) * signal.fftconvolve(x[None], tail, axes=1)[:, :N]


def hush():
    """Steady faint noise of the quiet room and preamp, separate at each microphone."""
    return undb(HUSH_DB) * unit(colour(rng.standard_normal((2, N)), HUSH_TONE))


def scene():
    """Place the box before both microphones, in its room."""
    slips = fibres(rate=2500, spread_db=2.45, smooth=1.) * clumps()
    hands = handling()
    weave_db = hands[4]
    tick, tick_side = hook_ticks()
    hooks = pops(jerks(count=6), share=.1, first=3., drum_db=-10.5, snap_db=-6.5, crackle_db=-3)
    folds = pops(creases(weave_db, count=120), share=.08, first=2.3, drum_db=3.9, snap_db=-5, crackle_db=-6)
    mid = box(hands, slips, hooks, folds, lead=0.82) + squeaks() + knocks() + tick
    # the sound comes from all over a wide panel, so in the treble the microphones hear unlike mixes of it
    side = colour(box(hands, slips, 1.1 * hooks, folds, lead=0.64), SIDE_GAIN)
    side = side + tick_side + 0.28 * np.gradient(mid)  # the left microphone is a little nearer, so it leads
    half = np.array(LEFT_OVER_RIGHT) * [1, .5]  # half the difference goes to each microphone
    left = colour(mid + side, half)
    right = colour(mid - side, half * [1, -1])
    return np.array([left, right]) + room(mid) + hush()


def record(dry):
    """Round off the loudest peaks, then lower the extreme treble in a step and end it."""
    soft = np.tanh(1.35 * dry) / 1.35
    step = signal.sosfilt(signal.ellip(6, .2, 28, STEP_HZ, fs=SR, output="sos"), soft)
    return signal.sosfilt(signal.ellip(10, .2, 80, TOP_HZ, fs=SR, output="sos"), step)


dry = scene()
out = record(dry)
store_pcm(out)
```